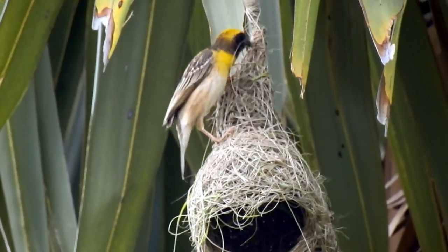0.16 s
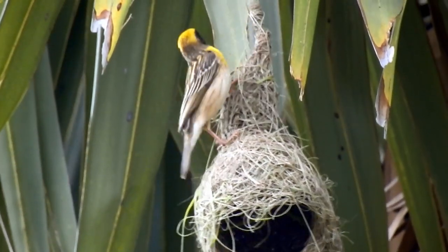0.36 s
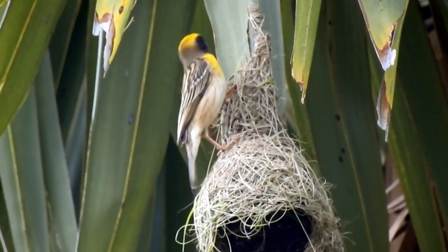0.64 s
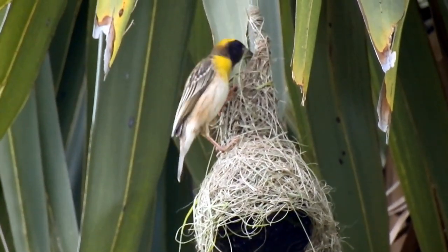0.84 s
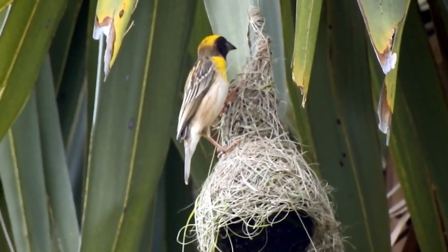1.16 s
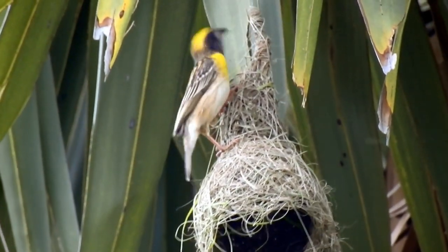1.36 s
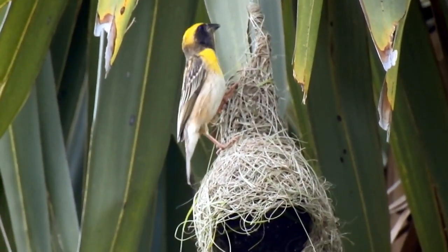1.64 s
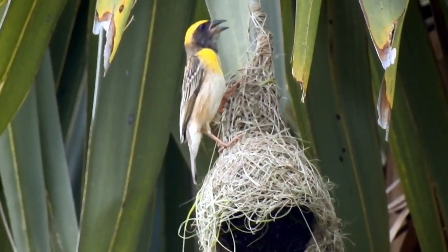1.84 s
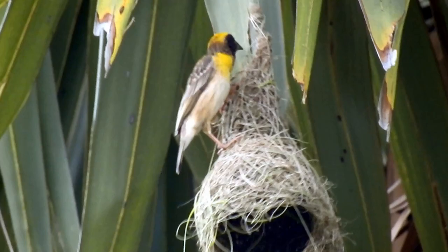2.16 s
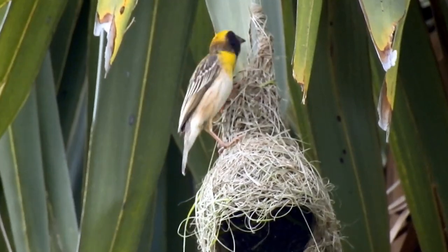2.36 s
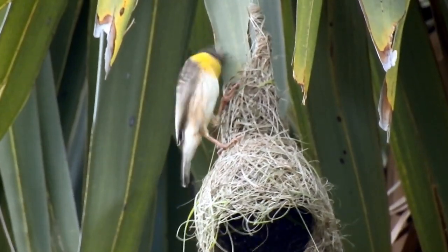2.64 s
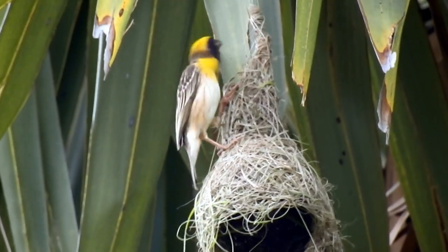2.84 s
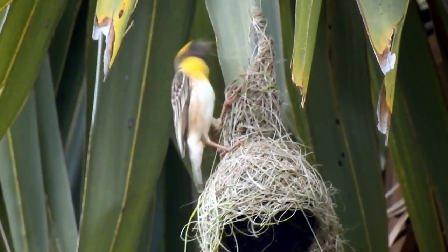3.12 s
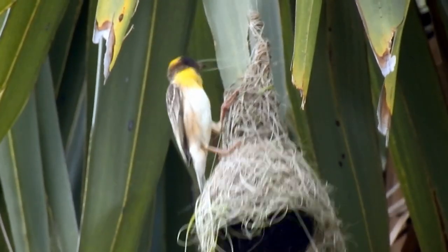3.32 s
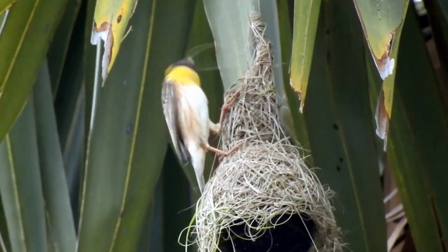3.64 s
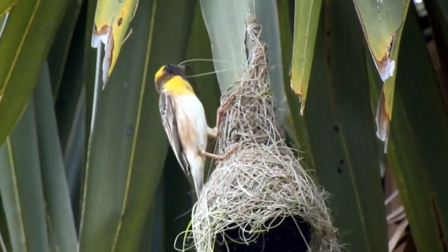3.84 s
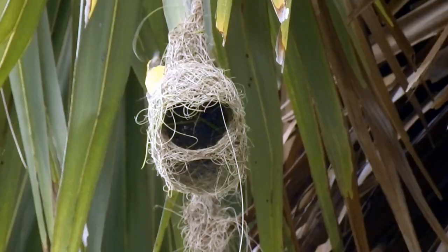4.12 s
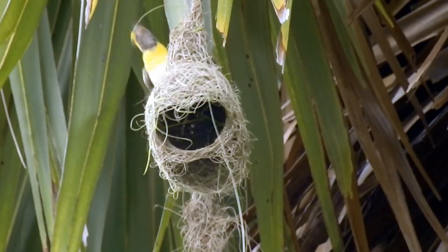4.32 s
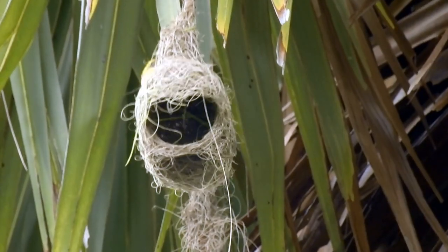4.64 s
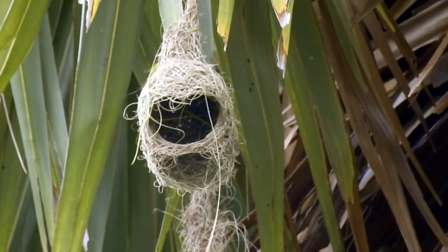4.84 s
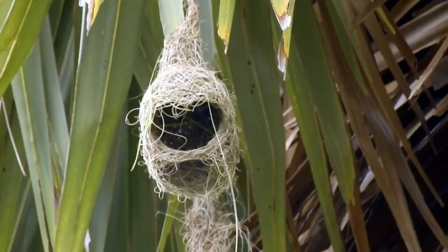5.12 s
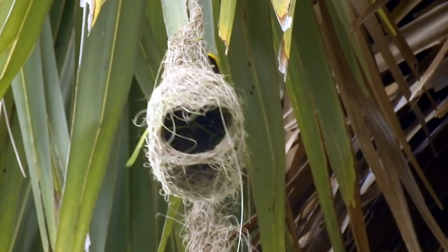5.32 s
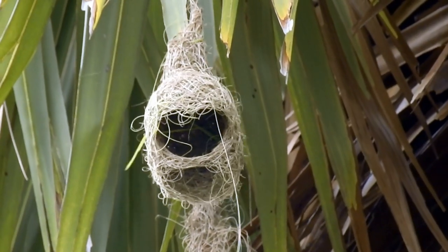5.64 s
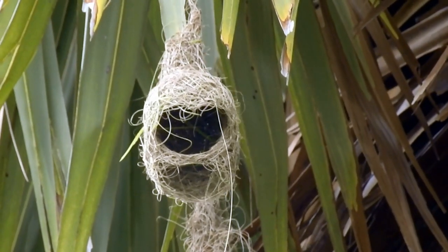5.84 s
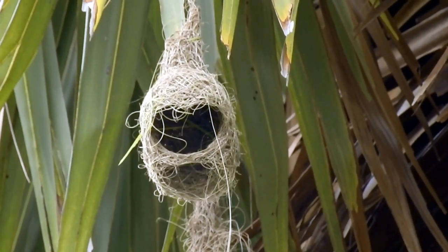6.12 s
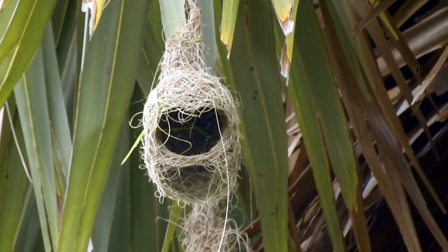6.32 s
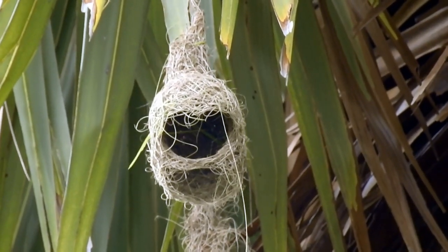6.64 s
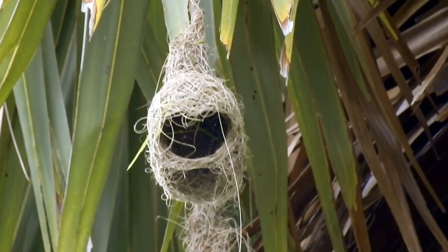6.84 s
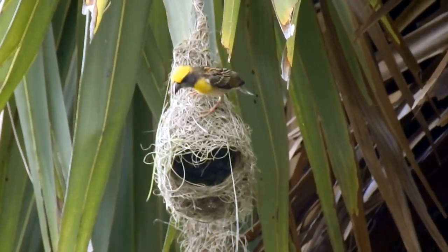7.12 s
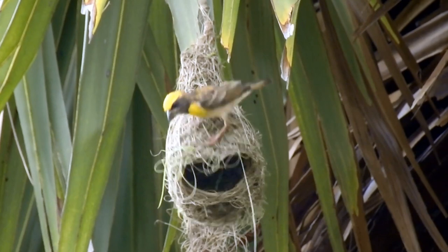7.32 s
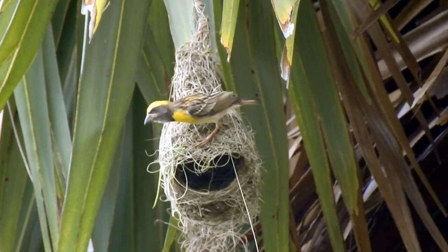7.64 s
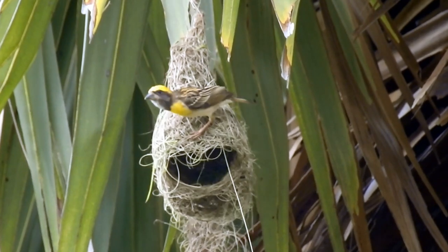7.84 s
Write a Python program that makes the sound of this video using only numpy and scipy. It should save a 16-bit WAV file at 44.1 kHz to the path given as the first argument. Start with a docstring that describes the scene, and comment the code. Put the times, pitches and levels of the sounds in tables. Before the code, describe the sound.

Small birds chirp in rapid high bursts, then trill and whistle thinly, over low wind rumble, faint insects and a few dry leaf snaps.

```python
"""Weaver birds in a palm

Weavers chatter in swept tones from the syrinx: chirps and arched chips over a raspy twitter, then
two-voiced trills and thin whistles. Insects buzz near 6 kHz, a cricket pulses and a dove coos far off.
Wind rumbles low and rustles the leaves; dry fronds knock and snap near the microphones, ringing in
their damped modes. The foliage scatters short echoes."""
import sys
import numpy as np
from scipy import signal
from scipy.fft import rfft, irfft, next_fast_len
from scipy.io import wavfile
from scipy.ndimage import uniform_filter1d

SR = 44100
rng = np.random.default_rng(int(sys.argv[2]) if len(sys.argv) > 2 else 0)


def int16_out(signal):
    """Quantize to a 16-bit WAV file."""
    q = np.round(np.clip(np.atleast_2d(signal).T, -1, 1) * 32767)
    wavfile.write(sys.argv[1], SR, q.astype(np.int16))


N = 351477

# bursts of chatter: t/s, length/s, crest time/length, relative crest level/dB, tilt/(dB per octave)
BURSTS = [(0.58, 0.04, 0.48, -36, 3), (0.609, 0.078, 0.27, -32.5, -13), (0.824, 0.083, 0.22, -29.5, -13),
          (0.938, 0.065, 0.86, -44.5, 8), (1.079, 0.081, 0.25, -34.5, -13),
          (1.254, 0.057, 0.22, -39.5, 6.5), (1.479, 0.085, 0.3, -29, -7), (1.67, 0.06, 0.59, -33.5, 3),
          (1.731, 0.095, 0.2, -30.5, -11), (1.859, 0.2, 0.71, -29.5, -2), (2.047, 0.17, 0.58, -26.5, 0.5),
          (2.242, 0.16, 0.53, -27.5, 1.5), (2.398, 0.14, 0.46, -35.5, 10), (2.527, 0.23, 0.31, -30.5, -4),
          (2.757, 0.26, 0.24, -27.5, 4), (3.045, 0.085, 0.65, -33, -7), (3.134, 0.069, .5, -30.5, 5),
          (3.318, 0.11, 0.59, -29, 4), (3.446, 0.13, 0.49, -33, 8), (3.666, 0.15, 0.36, -36, 9),
          (3.814, .12, 0.5, -28, 4.5), (3.999, 0.083, 0.42, -30, 6), (4.295, 0.064, 0.26, -42, -8),
          (4.496, 0.065, 0.28, -41.5, -7), (7.078, 0.068, 0.34, -23, -9), (7.231, 0.11, 0.34, -37, -25),
          (7.549, 0.2, 0.75, -33, -15.5)]
# chips that shoot up and plunge: t/s, relative level/dB, top f/Hz
CHIPS = [(0.829, -35, 5250), (0.974, -33, 5180), (1.08, -27.5, 5220), (1.275, -33, 5040),
         (1.485, -29.5, 5150), (1.675, -34, 5180), (1.734, -31, 4990), (1.865, -28, 5120),
         (1.886, -32, 4890), (1.928, -21.5, 5610), (2.051, -29, 5140), (2.101, -16, 5490),
         (2.3046, -20.5, 4790), (2.404, -27.5, 5530), (2.447, -29, 5400), (2.478, -28, 5240),
         (2.539, -27, 4500), (2.608, -22.5, 6040), (2.653, -19.5, 5570), (2.766, -18.5, 5910),
         (2.8075, -16, 5610), (2.8877, -16, 6090), (2.938, -15.5, 5690), (3.057, -28, 5090),
         (3.14, -23, 5500), (3.321, -21.5, 5820), (3.3607, -24, 5520), (3.392, -31, 5400),
         (3.4584, -23.5, 5760), (3.5, -21, 5530), (3.53, -22, 5450), (3.666, -21, 5740), (3.709, -22, 5420),
         (3.738, -30, 5370), (3.817, -18.5, 6000), (3.857, -24, 5670), (3.885, -19.5, 5380),
         (4.009, -21.5, 5540), (4.035, -25, 5140)]


def amp(db):
    """Level to amplitude ratio."""
    return 10 ** (np.asarray(db) / 20)


def evened(x):
    """Normalisation to unit RMS."""
    return x / np.sqrt(np.mean(x ** 2) + 1e-20)


def wander(count, span):
    """Random modulation of unit RMS: white noise averaged over span samples."""
    return evened(uniform_filter1d(rng.standard_normal(count), span))


def curve_at(points, hz):
    """Interpolation on a logarithmic frequency axis."""
    f, value = np.transpose(points)
    return np.interp(np.log(hz + 1), np.log(f + 1), value)


def add(mix, start, sound):
    """Superposition of a sound on the mix, from start in seconds."""
    part = mix[..., round(start * SR):][..., :sound.shape[-1]]
    part += sound[..., :part.shape[-1]]


def resonate(x, hz, *widths):
    """Resonance by heterodyning: shift hz to zero, smooth, shift back; once for each bandwidth."""
    carrier = np.exp(2j * np.pi * np.cumsum(hz * np.ones(len(x))) / SR)
    for width in widths:
        pole = np.exp(-np.pi * width / SR)
        x = 2 * (carrier * signal.lfilter([1 - pole], [1, -pole], x / carrier)).real
    return x


def sweeps(starts, length, hz, db, overtone_db, size):
    """Frequency modulation: each short tone follows a parabola through start, middle and end pitch."""
    u = np.arange(size) / (SR * length[:, None])
    first, middle, last = hz[:, :, None]
    pitch = first * (1 - u) * (1 - 2 * u) + 4 * middle * u * (1 - u) + last * u * (2 * u - 1)
    phase = 2 * np.pi * (np.cumsum(pitch, axis=1) / SR + rng.random((len(starts), 1)))
    tone = np.sin(phase) + amp(overtone_db) * np.sin(2 * phase)
    tone *= amp(db)[:, None] * np.sin(np.pi * np.minimum(u, 1)) ** .6
    at = (starts * SR).astype(int)[:, None] + np.arange(size)
    return np.bincount(at.ravel(), tone.ravel(), N + size)[:N]


def whistles(contours, overtone_db, pan_db, lag_us=0):
    """Nearly pure tones on contours of t/s, f/Hz, level/dB, placed by stereo level and time cues."""
    out = np.zeros((2, N))
    lag = np.array([[1], [0]]) * lag_us / 1e6
    balance_db = np.array([[.5], [-.5]]) * pan_db
    for rows in contours:
        s, *columns = np.transpose(rows)
        t = np.arange(s[0], s[-1], 1 / SR)
        hz, db = (uniform_filter1d(np.interp(t, s, c), 120) for c in columns)
        phase = 2 * np.pi * (np.cumsum(hz) / SR - hz * lag)
        tone = np.sin(phase) + amp(overtone_db) * (np.sin(2 * phase) + 0.52 * np.sin(3 * phase))
        envelope = np.clip(np.minimum(t - s[0], s[-1] - t) / .003, 0, 1)
        envelope *= 1 + .15 * wander(len(t), 250)
        add(out, s[0], np.sqrt(2) * tone * envelope * amp(db + balance_db))
    return out


def burst_envelope(row, start_db, end_db, tilt_change):
    """Growth and decay: times, levels and spectral tilts at a burst's start, crest and end."""
    start, length, crest, db, tilt = row
    share = np.array([0, np.clip(crest, .05, .95), 1])
    return start + length * share, db + np.array([start_db, 0, end_db]), tilt + tilt_change * (share - .5)


def wind():
    """Partly coherent noise: rumble and leaf rustle as random spectra with drifting patches."""
    strength = [(0.0, -42, -52.5), (2.0, -44, -51.5), (3.8, -43.5, -51.5), (4.4, -41.5, -51.5),
                (5.2, -41.5, -49.5), (5.7, -40.5, -49.5), (6.1, -38, -49.5), (6.3, -42, -49),
                (6.9, -40.5, -50.5), (7.0, -43.5, -52), (7.97, -41.5, -52.5)]  # t/s, rumble level/dB, relative rustle level/dB
    rumble = [(12, -49), (20, -51), (57, 6.5), (102, -1.5), (184, -5.5), (271, -31.5), (340, -26),
              (400, -34), (520, -56), (880, -120)]  # wind spectrum: f/Hz, relative level/dB
    rustle = [(120, -3.5), (200, -11.5), (315, -18.5), (630, -12), (812, -17.5), (1780, -18.5), (2470, -22),
              (2800, -15.5), (3900, -16), (4750, -16.5), (5700, -9.5), (6590, -24), (8350, -24.5),
              (10000, -23.5), (13900, -45.5), (15500, -63)]  # leaf spectrum: f/Hz, relative level/dB
    likeness = [(60, 0.93), (130, 0.96), (290, 0.55), (640, 0.74), (1410, 0.64), (3100, 0.73),
                (6820, -0.62), (15000, -0.036)]  # f/Hz, left-right correlation
    frames, hz = N // 256 + 5, np.fft.rfftfreq(1024, 1 / SR)
    out, t = np.zeros((2, N)), np.arange(N) / SR
    s, *levels = np.transpose(strength)
    correlation = np.clip(curve_at(likeness, hz), -1, 1)[:, None]
    for shape, level_db, lift_db, patchy_db in zip((rumble, rustle), levels, (0, 4.0), (1.2, 2.2)):
        a, b, c, d, patches = rng.standard_normal((frames, 513, 5)).T
        patches = evened(uniform_filter1d(uniform_filter1d(patches, 8, 0), 10, 1))
        left = a + 1j * b
        right = correlation * left + np.sqrt(1 - correlation ** 2) * (c + 1j * d)
        gain = amp(curve_at(shape, hz)[:, None] + patchy_db * (patches + 0.91 * wander(frames, 20)))
        _, noise = signal.istft(np.array([left, right]) * gain, nperseg=1024, noverlap=768)
        out += evened(noise[:, :N]) * amp(np.interp(t, s, level_db) + lift_db)
    return out * amp([[.5], [-.5]])


def moan():
    """Resonance: noise in one narrow low band makes the wind moan."""
    strength = [(0, -55.5), (1.6, -49.5), (3, -79), (5.4, -68), (6.1, -39.5), (6.7, -50.5), (7.97, -50)]  # t/s, level/dB
    hz, width_hz = 97, 16.6
    hum = resonate(rng.standard_normal(N), hz, width_hz, 2 * width_hz)
    return evened(hum) * amp(np.interp(np.arange(N) / SR, *np.transpose(strength)))


def drone():
    """Narrow-band noise, faint and far, comes and goes under slow amplitude modulation."""
    hz, width_hz = 1140, 41
    swell = evened(uniform_filter1d(wander(N, 3000), 3000)).clip(-2, 2)
    band = resonate(rng.standard_normal(N), hz, width_hz, width_hz)
    return evened(band) * amp(-73.5 + 6.5 * swell)


def insects():
    """Amplitude modulation: uneven wing strokes pulse narrow bands of noise, heard from all sides."""
    strength = [(0.0, -39), (0.24, -46.5), (1.82, -40.5), (2.13, -39.5), (2.66, -42), (2.85, -35.5),
                (3.33, -42), (3.57, -33), (4.33, -45), (5.01, -41.5), (5.73, -49), (6.04, -44.5),
                (6.659, -47.5), (7.05, -45.5), (7.15, -44), (7.45, -41.5), (7.75, -42), (7.97, -44.5)]  # t/s, level/dB
    buzzes = [(5750, 810, 27, -4), (6486, 590, 180, -3.5)]  # f/Hz, bandwidth/Hz, stroke rate/Hz, relative level/dB
    level_db = np.interp(np.arange(N) / SR, *np.transpose(strength))
    out = np.zeros((2, N))
    for hz, width, stroke_hz, db in buzzes:
        strokes = np.cumsum(stroke_hz * (1 + 9.1 * uniform_filter1d(rng.standard_normal(N), 2000))) / SR
        drift = uniform_filter1d(rng.standard_normal(N), 2500, mode="wrap")
        swell = amp(3.7 * evened(uniform_filter1d(drift, 2500)).clip(-2, 1.5))
        gate = swell * (1.1 + np.exp(-(strokes % 1) / 2.3))
        shared, *own = rng.standard_normal((3, N))
        for side in range(2):
            buzz = resonate(gate * (own[side] + 0.47 * shared), hz, width, 0.93 * width)
            out[side] += evened(buzz) * amp(level_db + db)
    return out


def dove():
    """Atmospheric fading: far coos and hoots, each sagging in pitch, waver in the wind."""
    coos = [(.01, 0.12, 468, -47.5), (0.251, 0.11, 480, -46.5), (0.495, 0.1, 470, -45),
            (0.629, 0.14, 462, -55), (6.25, 0.072, 1260, -49.5), (7.362, 0.1, 820, -52.5),
            (7.508, .065, 1353, -48), (7.579, 0.047, 1360, -49), (7.645, 0.039, 1280, -53)]  # t/s, length/s, starting f/Hz, relative level/dB
    sag, crest = 0.107, 0.31  # shares of the pitch and of the length
    contours = [[(s, hz, db - 2),
                 (s + crest * length, hz * (1 - sag * crest), db),
                 (s + length, hz * (1 - sag), db - 0.5)] for s, length, hz, db in coos]
    fading = .4 + .5 * wander(N, 1000)
    return whistles(contours, overtone_db=-30, pan_db=2) * fading


def cricket():
    """Pulse modulation: one carrier tone sounds in short, even pulses."""
    pulse_trains = [(0.026, .1, -55), (0.171, 0.065, -45), (0.301, 0.056, -47.5), (0.436, 0.086, -47),
                    (4.171, 0.04, -44), (4.518, 0.066, -43), (4.653, 0.073, -42), (5.91, 0.076, -45),
                    (6.433, 0.056, -46), (7.357, 0.067, -40), (7.512, 0.072, -40), (7.662, 0.055, -40.5)]  # t/s, length/s, relative level/dB
    carrier_hz, pulse_hz = 5610, 82
    out = np.zeros(N)
    for start, length, db in pulse_trains:
        t = np.arange(0, length, 1 / SR)
        pulses = np.maximum(np.sin(2 * np.pi * pulse_hz * t), 0)
        add(out, start, amp(db + 6.5) * pulses * np.sin(2 * np.pi * carrier_hz * t))
    return out


def brushes():
    """Friction noise: wing and fibre brush in a grainy wide band that swells and fades."""
    strokes = [(0.412, 0.07, -51, 900), (1.164, 0.062, -50, 1080), (6.367, 0.045, -49.5, 1150),
               (6.484, 0.03, -47.5, 1110), (6.047, 0.094, -63, 8000), (6.192, 0.028, -49, 7000),
               (6.27, 0.14, -42.5, 5200), (6.334, 0.063, -51.5, 2460), (6.836, 0.044, -49, 9000)]  # t/s, length/s, level/dB, centre f/Hz
    out = np.zeros((2, N))
    for start, length, db, hz in strokes:
        count = int(length * SR)
        grain = amp(3.2 * wander(count, 150))
        shared, *own = rng.standard_normal((3, count))
        pair = np.array([resonate(grain * (shared + 0.52 * x), hz, 0.42 * hz, 0.43 * hz) for x in own])
        add(out, start, amp(db) * evened(pair) * np.hanning(count))
    return out


def twitter():
    """Superposition: tiny steep sweeps, mostly falling, merge into a rasp in each burst."""
    colour = [(2600, -18.5), (3300, 1.5), (4500, 4.5), (5500, 5.5), (7000, 0), (8500, -11.5), (11500, -19)]  # twitter spectrum: f/Hz, relative level/dB
    sweeps_per_s = 1350
    out, low, high = np.zeros(N), colour[0][0], colour[-1][0]
    for row in BURSTS:
        t, level_db, tilt = burst_envelope(row, start_db=-7.5, end_db=-12.5, tilt_change=-1.5)
        length = t[-1] - t[0]
        when, long, place, glide, strength = rng.random((round(sweeps_per_s * length), 5)).T
        starts = t[0] + when * length
        mid_hz = low * (high / low) ** place
        step = .3 * (glide - .85)
        pitch = mid_hz * np.array([1 - step, 1 + 0.16 * abs(step), 1 + step])
        colour_db = curve_at(colour, mid_hz) + np.interp(starts, t, tilt) * np.log2(mid_hz / 4000)
        db = np.interp(starts, t, level_db) - 11.0 + 7 * strength + colour_db
        out += sweeps(starts, .0025 + .005 * long, pitch, db, overtone_db=-45, size=340)
    return out


def chirps():
    """Swept tones: clear notes at set moments, and lesser ones strewn through each burst."""
    notes = [(0.614, 0.013, 3170, -0.02, -31), (0.633, 0.014, 3095, -0.0089, -31.5),
             (0.65, 0.017, 2860, -0.015, -49), (0.634, 0.042, 4460, -0.031, -44),
             (0.855, 0.037, 4380, 0.11, -44), (0.956, .012, 3950, -.03, -47),
             (1.252, 0.016, 3880, 0.0026, -47), (1.686, 0.011, 3850, -0.15, -44),
             (1.752, 0.025, 6480, 0.01, -42.5), (0.836, 0.03, 3150, -0.049, -32.5),
             (0.868, 0.029, 2870, -0.15, -48), (0.96, 0.009, 4920, -0.26, -38.5),
             (1.088, 0.022, 3150, 0.0093, -34), (1.107, 0.019, 2860, -0.038, -42.5),
             (1.109, 0.037, 4470, -0.013, -44), (1.255, 0.011, 4700, -0.39, -41.5),
             (1.495, 0.012, 3110, -0.041, -29.5), (1.505, 0.035, 4390, -0.00091, -35.5),
             (1.511, 0.017, 2900, -0.039, -35.5), (1.741, 0.031, 3290, -0.023, -33.5),
             (1.763, 0.021, 3090, -0.055, -35), (1.756, 0.053, 4530, -0.036, -34.5),
             (1.938, 0.037, 3660, 0.028, -32), (1.97, 0.021, 5030, 0.14, -28.5),
             (1.991, 0.0098, 6500, -0.013, -30.5), (2.002, 0.027, 5230, -0.093, -31.5),
             (2.141, 0.0077, 4970, -0.034, -20), (2.115, 0.029, 3586, 0.022, -31),
             (2.119, .014, 7080, 0.079, -28.5), (2.172, 0.022, 5020, -0.062, -28),
             (2.271, 0.013, 5180, 0.043, -27.5), (2.281, 0.025, 3500, -0.0077, -26.5),
             (2.327, 0.022, 7540, 0.029, -32), (2.34, 0.032, 5640, -0.25, -34.5),
             (2.459, .015, 3710, -.01, -34), (2.462, 0.044, 7440, -0.05, -35),
             (2.554, 0.022, 3596, 0.001, -31), (2.64, 0.014, 6300, 0, -31),
             (2.672, 0.014, 7400, -0.038, -30.5), (2.661, 0.018, 3700, 0, -33),
             (2.667, .01, 7930, -.12, -36), (2.579, 0.018, 2890, -0.35, -37.5),
             (2.679, 0.0087, 5040, 0.35, -33), (2.688, 0.0062, 4900, -0.27, -34),
             (2.693, 0.0085, 6470, -0.13, -32), (2.698, 0.012, 5500, 0.085, -31.5),
             (2.071, 0.011, 7560, -.12, -39), (2.79, 0.021, 6600, -0.023, -31),
             (2.833, 0.017, 5240, 0.035, -23.5), (2.918, 0.014, 5600, -.05, -26),
             (2.952, 0.014, 7750, -0.08, -31), (2.975, 0.0056, 6720, -.2, -29),
             (2.912, 0.017, 6770, -.04, -32), (2.97, 0.022, 2630, -0.041, -46),
             (3.097, 0.013, 4480, 0.00032, -35.5), (3.385, 0.015, 7300, -.06, -34),
             (3.156, 0.011, 8100, 0, -41), (3.173, 0.011, 6900, -0.144, -36.5), (3.15, 0.027, 4000, 0, -39),
             (3.372, 0.016, 3700, 0, -39), (3.407, 0.0082, 6570, -0.25, -32),
             (3.476, 0.087, 6580, 0.2, -34), (3.506, 0.034, 3965, -0.0059, -32),
             (3.546, 0.0093, 6090, -0.006, -23), (3.55, 0.057, 6040, -0.16, -33),
             (3.47, 0.026, 3410, -0.16, -50), (3.678, 0.022, 3350, -.18, -43),
             (3.516, 0.02, 7940, 0.015, -39), (3.696, 0.024, 6200, 0.037, -33),
             (3.724, 0.013, 4020, -0.027, -33), (3.732, 0.0062, 7560, -0.017, -31),
             (3.861, 0.017, 5460, 0.0072, -25.5), (3.872, 0.012, 4100, -0.067, -40),
             (3.901, 0.0063, 6120, -0.23, -28), (4.026, 0.0089, 4190, -0.049, -31),
             (4.03, 0.014, 8180, -0.072, -46), (4.31, 0.028, 3000, -0.048, -46),
             (4.303, 0.0094, 4140, -0.48, -46), (4.33, .008, 4490, -.15, -44),
             (4.51, 0.012, 3510, -0.0014, -46), (4.507, .008, 4640, -.2, -48),
             (4.803, 0.021, 4910, 0.12, -35), (4.992, 0.0073, 4370, 0.03, -43),
             (5.02, 0.011, 4700, 0.072, -35), (5.04, 0.0062, 5020, 0.06, -30.5),
             (4.944, 0.016, 4700, 0.27, -38.5), (5.284, 0.023, 3060, .12, -43),
             (5.223, 0.006, 4300, 0.24, -35), (5.138, 0.014, 4700, 0.14, -43),
             (5.235, 0.006, 4220, -0.18, -33), (5.352, 0.0087, 3010, 0.17, -34), (5.31, .014, 3520, 0, -41),
             (5.4, 0.013, 4120, 0.19, -34), (5.475, 0.014, 3470, .03, -36),
             (5.772, 0.013, 3560, 0.061, -34), (5.794, 0.019, 4450, 0.072, -36),
             (5.818, 0.016, 4730, -0.34, -40), (6.058, 0.0068, 6060, 0.18, -31.5),
             (6.062, 0.011, 4230, -0.01, -39), (7.081, 0.0084, 3553, -0.039, -22.5),
             (7.089, 0.0058, 3533, 0, -28), (7.096, 0.0083, 3570, -0.011, -24),
             (7.105, 0.0063, 3380, -0.01, -30), (7.211, 0.0163, 4300, -0.1, -28),
             (7.224, 0.027, 4153, 0.01, -29), (7.69, 0.035, 2400, 0, -40),
             (7.635, 0.077, 3390, -0.0097, -44.5), (7.684, 0.027, 3340, 0.11, -44.5)]  # t/s, nominal length/s, middle f/Hz, glide/pitch, relative level/dB
    strays_per_s, droop = 6, 0.022  # droop: share by which the ends average below the middle pitch
    rows = [np.transpose(notes)]
    for start, length, _, db, tilt in BURSTS:
        when, long, place, glide, softness = rng.random((round(strays_per_s * length), 5)).T
        starts = start + (0.27 + 0.43 * when) * length
        hz = 3200 * 2 ** (1.2 * place)
        level_db = db - 12.5 - 5 * softness + tilt * np.log2(hz / 4500)
        rows.append([starts, 0.0087 + 0.0136 * long, hz, 0.335 * (glide - .6), level_db])
    starts, length, hz, glide, db = np.hstack(rows)
    pitch = hz * np.array([1 - droop - glide / 2, np.ones_like(hz), 1 - droop + glide / 2])
    clear = sweeps(starts - .002, length + .004, pitch, db + 2.5, overtone_db=-27, size=3600)
    return clear * (1 + 0.34 * wander(N, 40))  # the throat flutters


def arched_chips():
    """Frequency modulation on one arch; the second harmonic is strongest where the pitch is low."""
    arch = [(0, 0.79, -18), (.004, 0.93, -7), (.007, 1, -5.5), (.012, 1, -2.5), (.02, .7, -12),
            (.025, 0.83, -28), (0.037, 0.6, -43)]  # contour of a chip: t/s, f/top f, relative level/dB
    out, (s, share_at, db_at) = np.zeros(N), np.transpose(arch)
    gaps = np.diff([row[0] for row in CHIPS], prepend=0)
    for (start, db, hz), gap in zip(CHIPS, gaps):
        pace = 1.6 if gap < .06 or db < -27.5 else 1  # closely following or soft chips run faster
        t = np.arange(0, s[-1], pace / SR)
        share, shape_db = (uniform_filter1d(np.interp(t, s, c), 60) for c in (share_at, db_at))
        phase = 2 * np.pi * np.cumsum(hz * share) / SR
        tone = np.sin(phase) + amp(-13.0 - 37 * (share - 0.6943)) * np.sin(2 * phase)
        tone *= 1 + .2 * wander(len(t), 50)
        add(out, start, amp(db + shape_db) * tone * signal.windows.tukey(len(t), .1))
    return out


def under_notes():
    """Biphonation: the bird's other voice falls away under each arched chip."""
    fall = [(.004, .78, -32), (.008, .68, -31), (.014, .6, -24.5), (0.025, .58, -20.5), (.036, .5, -35),
            (0.047, 0.42, -29)]  # contour of the lower voice: t/s, f/top f of the chip, relative level/dB
    out, (s, share_at, db_at) = np.zeros(N), np.transpose(fall)
    t = np.arange(s[0], s[-1], 1 / SR)
    share, shape_db = (uniform_filter1d(np.interp(t, s, c), 80) for c in (share_at, db_at))
    for start, db, hz in CHIPS:
        phase = 2 * np.pi * np.cumsum(hz * share) / SR
        tone = np.sin(phase) + amp(-4.5) * np.sin(2 * phase)
        tone *= 1 + 0.88 * wander(len(t), 90)
        add(out, start + s[0], amp(db + shape_db) * tone * signal.windows.tukey(len(t), .1))
    return out


def side_bird():
    """Lateralisation: a whistle and three stepped calls reach the right side earlier and louder."""
    plunge = [(1.343, 4350, -45), (1.353, 6900, -29), (1.362, 7420, -40), (1.421, 6220, -24),
              (1.436, 6150, -32), (1.46, 6050, -55)]  # a whistle that leaps and falls: t/s, f/Hz, level/dB
    call = [(0, 5360, -20), (.014, 6250, -8), (0.023, 6450, -1), (.036, 6530, -19), (0.041, 6780, -3),
            (0.061, 6910, 0.5), (.074, 6420, -2), (0.079, 5640, -24), (.084, 3200, -28)]  # a climb to a step, then an arch: t/s, f/Hz, relative level/dB
    entries = [(7.095, -23.5, 0), (7.203, -23, 0), (7.316, -24, .012)]  # t/s, level/dB, t/s in the call before which points are skipped
    calls = [[(start + s, hz, db + shape_db) for s, hz, shape_db in call if s >= skip]
             for start, db, skip in entries]
    return whistles([plunge] + calls, overtone_db=-52, pan_db=-4.0, lag_us=46.3)


def thin_whistles():
    """Gliding, nearly sinusoidal tones from birds in front and, faintly, far away."""
    front = [
        [(6.89, 4250, -45), (6.908, 5050, -36.5), (6.94, 5115, -35.5), (6.966, 4660, -44), (6.995, 3530, -51)],
        [(7.293, 3700, -36), (7.321, 3662, -26), (7.346, 3700, -25.5), (7.356, 3730, -38), (7.402, 3713, -32),
         (7.411, 3646, -37), (7.426, 3710, -22.5), (7.44, 3702, -38.5), (7.47, 3680, -43), (7.48, 3670, -58),
         (7.575, 3673, -47)],
        [(6.728, 3930, -45), (6.74, 5040, -37.5), (6.755, 4550, -44)],
        [(6.77, 3700, -52), (6.778, 4100, -45), (6.786, 3900, -52)],
        [(2.18, 2400, -50), (2.202, 2570, -46.5), (2.245, 2630, -54)],
    ]  # one contour a whistle: t/s, f/Hz, level/dB
    far = [
        [(7.465, 5500, -56), (7.485, 4950, -49), (7.52, 4650, -55)],
        [(7.8, 5600, -62), (7.84, 4500, -59), (7.89, 3500, -62), (7.96, 2500, -69)],
    ]  # one contour a falling glide: t/s, f/Hz, level/dB
    return whistles(front + far, overtone_db=-32, pan_db=4.0)


def trills():
    """Source and filter: the two halves of the syrinx warble unevenly through a throat resonance."""
    # trills: t/s, length/s, crest time/length, relative crest level/dB, tilt/(dB per octave)
    phrases = [(4.734, 0.15, 0.77, -35.5, 2), (4.931, 0.16, 0.52, -34, 0.5),
               (5.131, 0.16, 0.56, -32.5, -1.5), (5.302, 0.17, 0.52, -31, -2), (5.473, 0.15, 0.55, -30, -3),
               (5.738, 0.16, 0.61, -30.5, -3.5), (5.997, 0.19, 0.52, -32, -1.5)]
    # halves of the syrinx: turning f/Hz, entry t/s, warble rate/Hz, swing/pitch, harmonic levels/dB
    voices = [(3510, 0, 50, -.31, (-6.5, -12, -21)), (3850, 0.015, 46, 0.34, (-7.5, -40))]
    throat_hz, throat_width_hz, rasp_hz, lead_s = 4480, 1050, 752, 0.014
    out, formant_hz = np.zeros(N), np.zeros(N) + throat_hz
    for row in phrases:
        s, *columns = burst_envelope(row, start_db=-4.5, end_db=-15, tilt_change=3)
        t = np.arange(s[0], s[-1], 1 / SR)
        level_db, tilt = (np.interp(t, s, c) for c in columns)
        age = t - s[0]
        # the resonance climbs as the beak opens, and sits higher in brighter trills
        add(formant_hz, s[0], throat_hz * (0.23 * (age / age[-1] - .5) + 0.035 * row[4]))
        climb = -0.1397 * np.maximum(1 - age / lead_s, 0) ** 2  # the lower voice opens alone, rising
        warbling = age > lead_s
        for hz, entry, warble_hz, swing, partials_db in voices:
            slow, reach, fast, shimmer = (wander(len(t), span) for span in (900, 700, 60, 60))
            turns = np.cumsum(warbling * warble_hz * (1 + .22 * slow)) / SR
            bow = uniform_filter1d(abs(np.sin(np.pi * turns)), 80)
            warble = swing * bow * (1 + .24 * reach) + 0.038 * reach * warbling
            pitch = hz * (1 + climb + warble + .02 * fast)
            phase = 2 * np.pi * np.cumsum(pitch) / SR
            tone = sum(amp(db + tilt * np.log2(k * pitch / 3500)) * np.sin(k * phase)
                       for k, db in enumerate(partials_db, 1))
            pulse = np.where(warbling, 1 + .35 * reach + .35 * shimmer, amp(-2))
            # an uneven buzz in the throat spreads each warble into sidebands
            rasp = np.sin(2 * np.pi * np.cumsum(rasp_hz * (1 + .25 * slow + 0.145 * fast)) / SR)
            pulse *= 1 + .55 * warbling * rasp
            fade = np.clip((age - entry) / 0.0034, 0, 1) * signal.windows.tukey(len(t), .1)
            add(out, s[0], amp(level_db) * tone * pulse * fade)
    return out + amp(3.5) * resonate(out, formant_hz, throat_width_hz)


def frond_blows(rows, t60, rough):
    """Modal ringing: a blow excites the frond near its brightest frequency, with a crack of noise."""
    modes = [(480, 10.5), (670, 6), (1130, 8.5), (1900, 9), (2670, -5.5), (3350, -7), (4100, 0),
             (5200, 0.5), (6100, 0), (7100, 5)]  # f/Hz, relative level/dB
    mode_hz, mode_db = np.transpose(modes)
    out, t = np.zeros(N), np.arange(2500) / SR
    for start, db, hz in rows:
        ring = amp(mode_db - 60 * np.log2(mode_hz / hz) ** 2) @ np.sin(2 * np.pi * np.outer(mode_hz, t))
        ring += rough * resonate(rng.standard_normal(len(t)), hz, 0.68 * hz, 2.1 * hz)
        crack = resonate(resonate(rng.standard_normal(len(t)), 4000, 7000), 4400, 6000)
        ring += amp(-14 - 60 * t / 0.0093) * crack
        add(out, start, amp(db - 60 * t / t60) * np.minimum(t / 0.00049, 1) * ring)
    return out


def frond_knocks():
    """Impact excitation, mainly of the low modes, gives hollow knocks."""
    knocks = [(5.817, -41.5, 1148), (5.83, -40, 1260), (5.873, -42, 1120), (5.997, -43, 1100),
              (6.016, -38, 1140), (6.049, -37, 1690), (6.073, -41, 573), (6.12, -40, 700),
              (6.164, -28.5, 720), (6.206, -44, 1100), (6.219, -44, 1100), (6.856, -36.5, 1860),
              (6.866, -38.5, 573), (7.078, -44.5, 2170)]  # t/s, relative level/dB, brightest f/Hz
    return frond_blows(knocks, t60=.035, rough=4.5) * amp(-4)


def frond_snaps():
    """Brief transients have wide spectra: quickly damped blows, each with a thin edge of hiss."""
    snaps = [(6.052, -18, 3300), (6.0594, -18, 5030), (6.084, -15.5, 4570), (6.126, -24.5, 4730),
             (6.156, -21, 2630), (6.165, -7, 2390), (6.1753, -8.5, 5300), (6.21, -33, 5560),
             (6.8555, -19, 3320), (6.8665, -14, 6030), (7.0792, -14.5, 3510)]  # t/s, relative level/dB, brightest f/Hz
    t, t60 = np.arange(900) / SR, 0.013
    out = through_air(frond_blows(snaps, t60, rough=1.12))
    for start, db, hz in snaps:
        hiss = resonate(rng.standard_normal(len(t)), 10700, 3000, 3000)
        add(out, start, amp(db - 20 + 6 * np.log2(hz / 5000) - 60 * t / t60) * hiss)
    return out


def through_air(x):
    """Radiation and absorption: a source as small as a beak gives little bass; distance dulls the top."""
    response = [(2000, -23.5), (2500, -3.5), (7500, 2.5), (9500, -4), (11500, -7.5), (13000, -48)]  # f/Hz, gain/dB
    size = next_fast_len(N)
    gain = amp(curve_at(response, np.fft.rfftfreq(size, 1 / SR)))
    return irfft(rfft(x, size) * gain, size)[:N]


def ports(x, lag_us):
    """Arrival time at two microphone ports: the left lags, and the balance leans with frequency."""
    balance = [(2500, 0), (4500, 1.4), (7000, -1.5), (11000, 0)]  # f/Hz, level of left over right/dB
    size = next_fast_len(N)
    hz = np.fft.rfftfreq(size, 1 / SR)
    left = amp(curve_at(balance, hz) / 2) * np.exp(-1j * np.pi * hz * lag_us / 1e6)
    return irfft(rfft(x, size) * np.array([left, 1 / left]), size)[:, :N]


def foliage(x, t60, apart):
    """Scattering: sparse echoes from the leaves, partly shared and partly each port's own."""
    delays = np.arange(80, 20000, 20) + rng.integers(0, 20, (3, 996))
    taps = np.zeros((3, 20100))
    np.put_along_axis(taps, delays, rng.choice([-1., 1.], delays.shape) * amp(-60 * delays / SR / t60), 1)
    pair = taps[2] + apart * taps[:2]
    return signal.oaconvolve(x[None], pair / np.linalg.norm(pair[0]), axes=1)[:, :N]


def scene():
    """Superposition of direct sound, leaf echoes and background."""
    weavers = through_air(chirps() + arched_chips() + under_notes() + twitter() + trills())
    whistling = side_bird() + thin_whistles()
    coos, chirring = dove(), cricket()
    knocks, snaps = frond_knocks(), frond_snaps()
    direct = ports(weavers, lag_us=13.6) + whistling + coos + ports(chirring, lag_us=21)
    direct += ports(knocks, lag_us=33) + ports(snaps, lag_us=51.0)
    echoes = amp(-7.5) * foliage(weavers, t60=.14, apart=.6)
    echoes += amp(-8.5) * foliage(whistling[0] + chirring, t60=0.3, apart=0.92)
    echoes += amp(-4.5) * foliage(snaps + knocks, t60=0.052, apart=4.1)
    return direct + echoes + insects() + wind() + moan() + drone() + brushes()


def record(dry):
    """Band limiting: the microphone drops the deepest bass, and a steep low-pass cuts the top."""
    low_hz, high_hz = 44, 15650
    dry = signal.sosfilt(signal.butter(3, low_hz, "high", fs=SR, output="sos"), dry)
    return signal.oaconvolve(dry, signal.firwin(1023, high_hz, window=("kaiser", 9), fs=SR)[None], "same")


dry = scene()
out = record(dry)
int16_out(out)
```